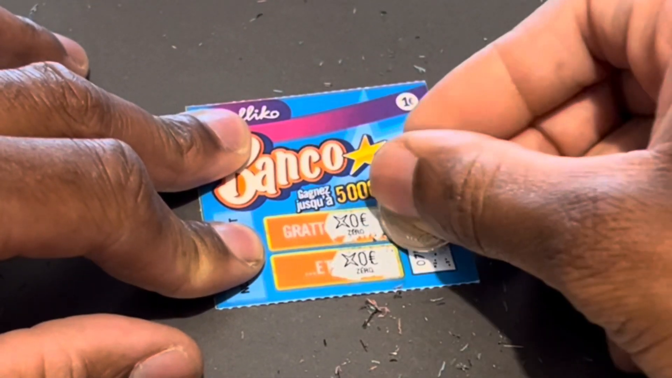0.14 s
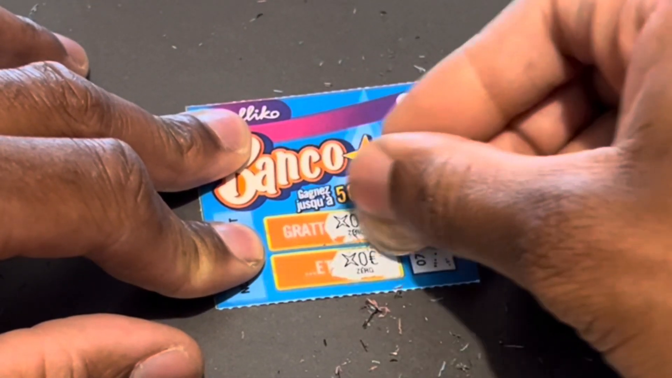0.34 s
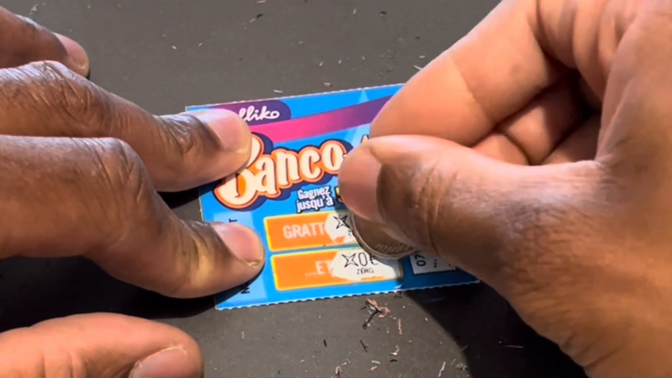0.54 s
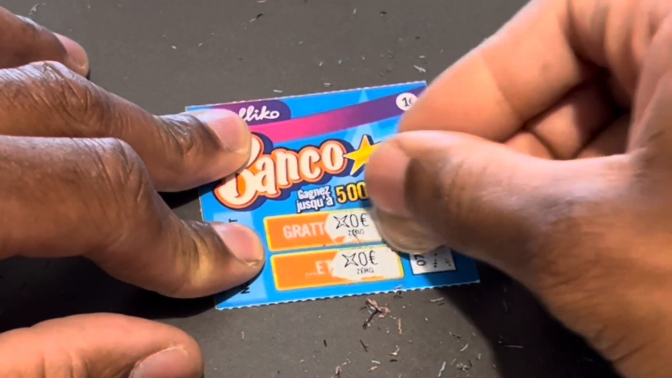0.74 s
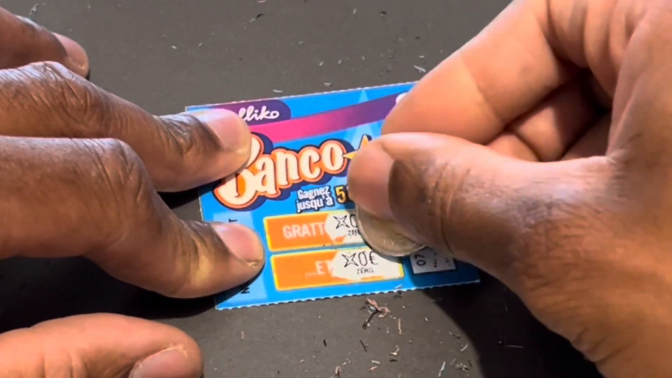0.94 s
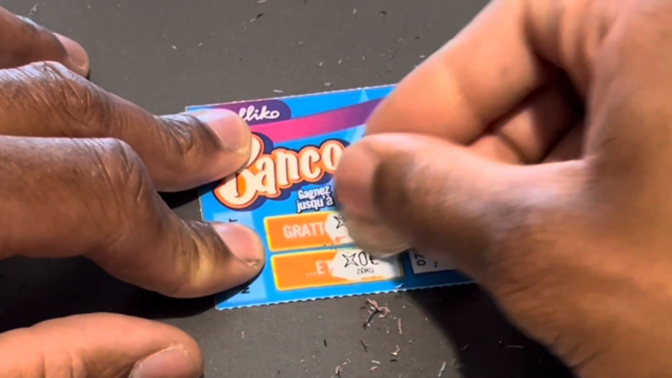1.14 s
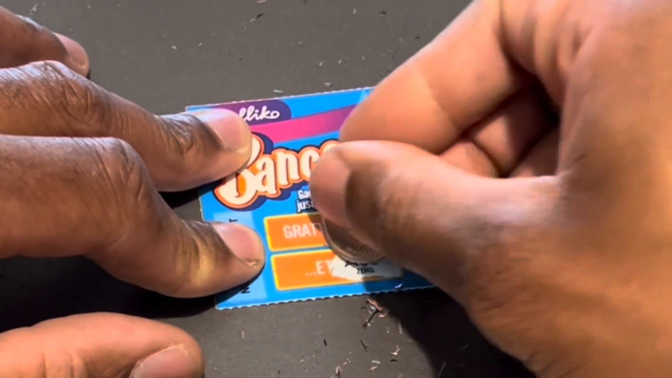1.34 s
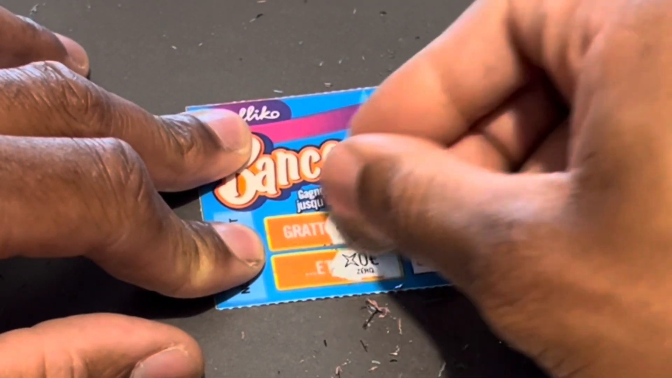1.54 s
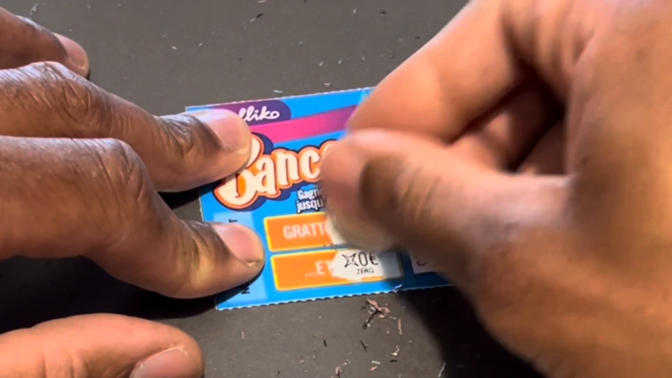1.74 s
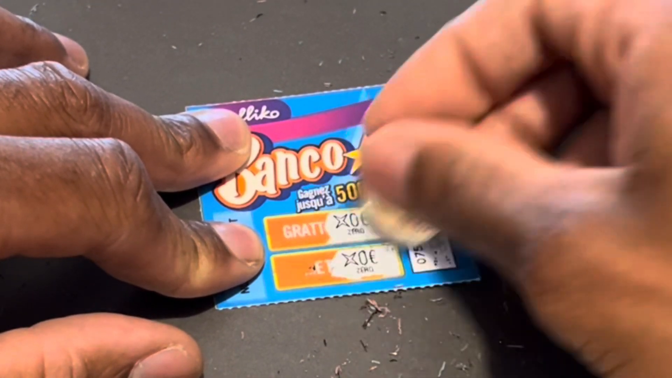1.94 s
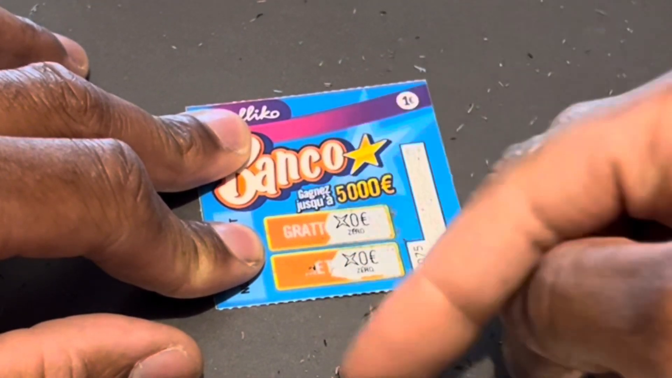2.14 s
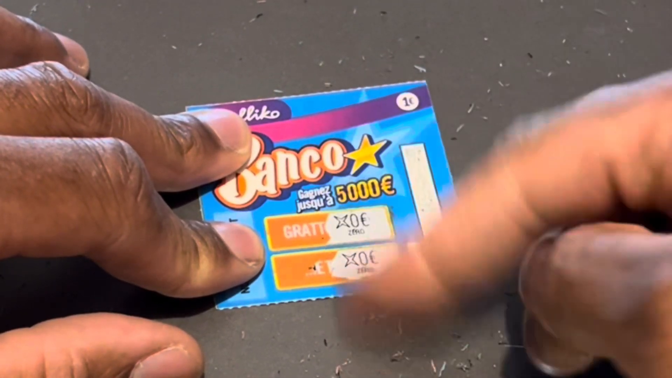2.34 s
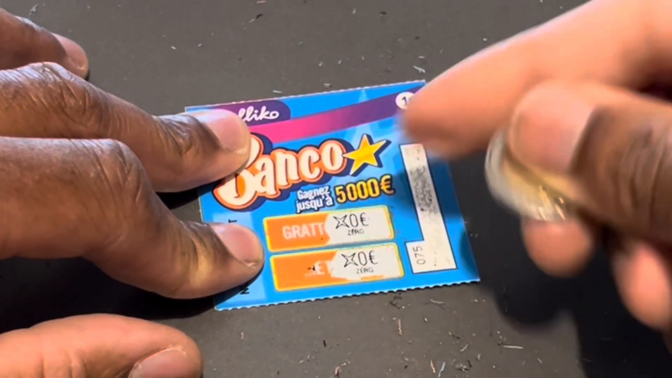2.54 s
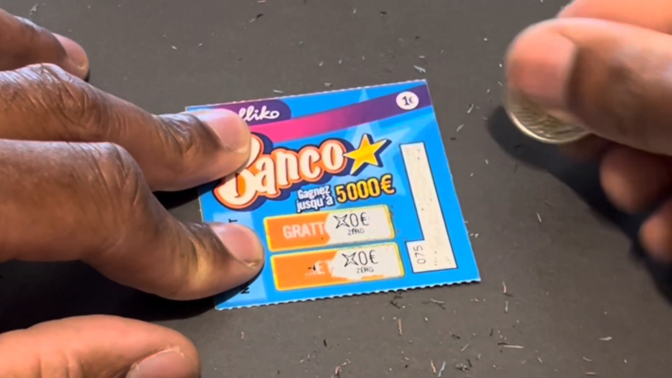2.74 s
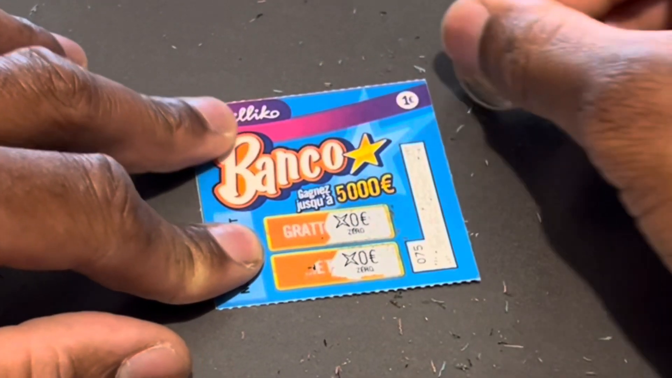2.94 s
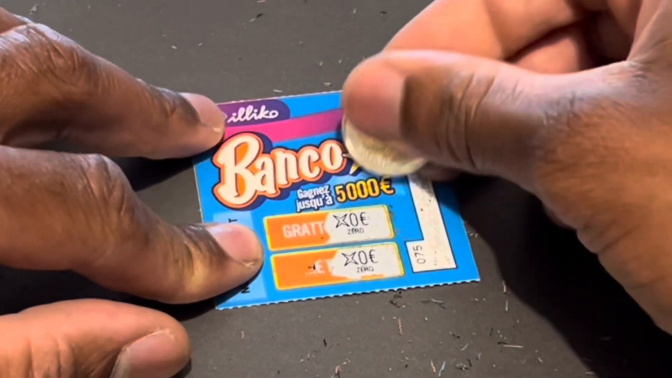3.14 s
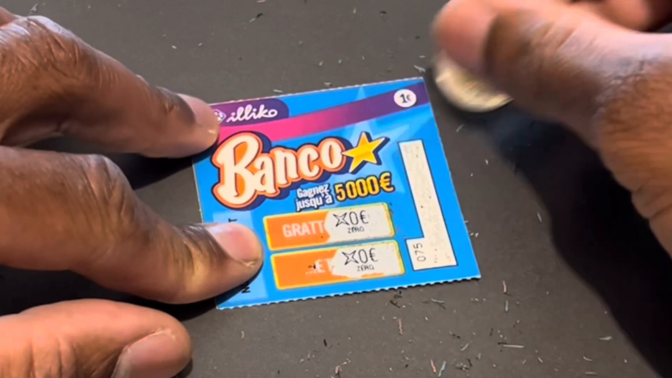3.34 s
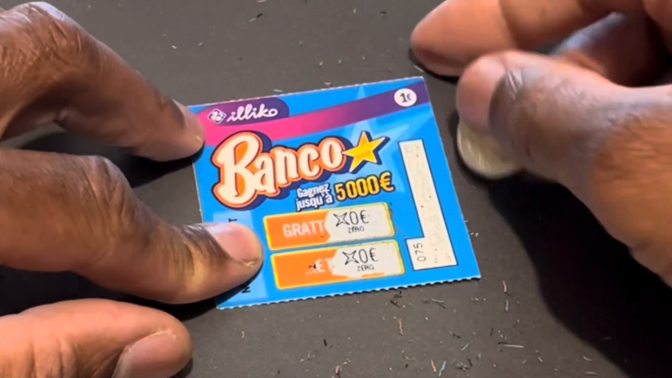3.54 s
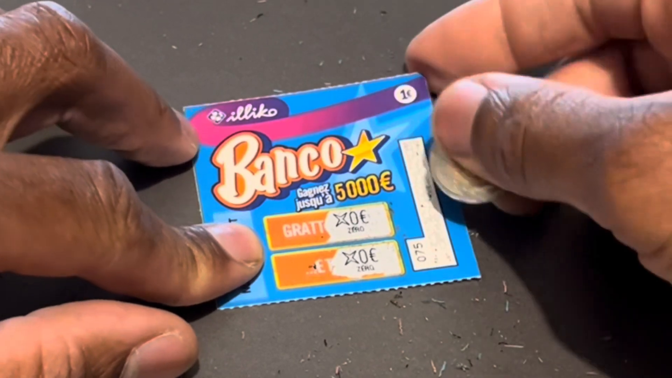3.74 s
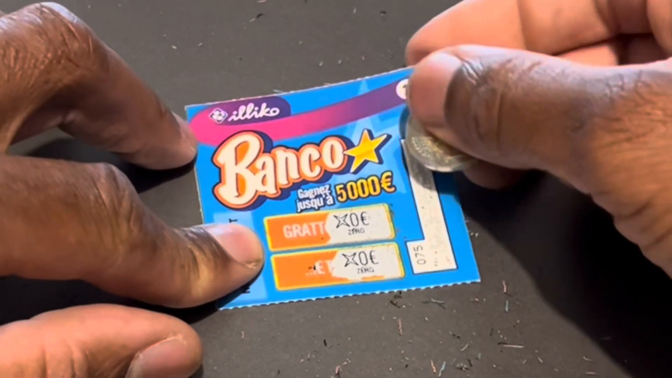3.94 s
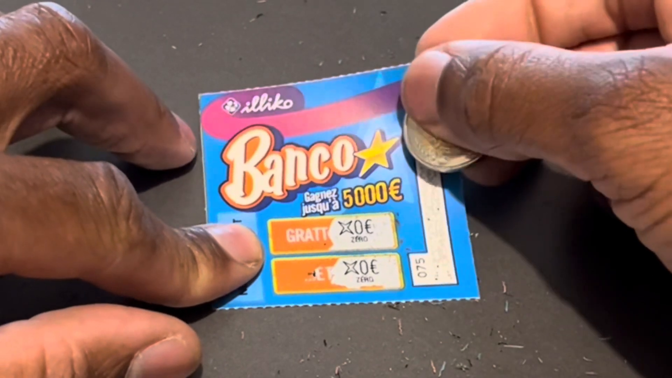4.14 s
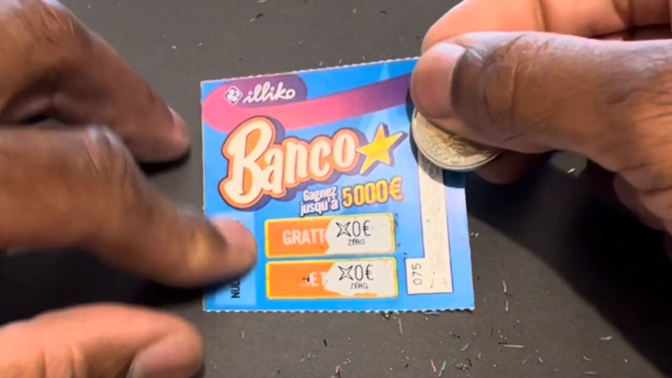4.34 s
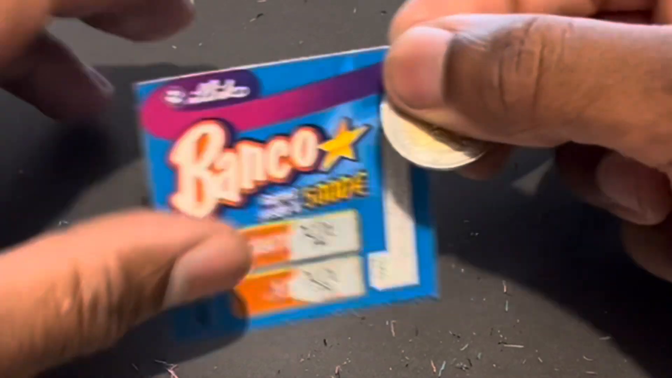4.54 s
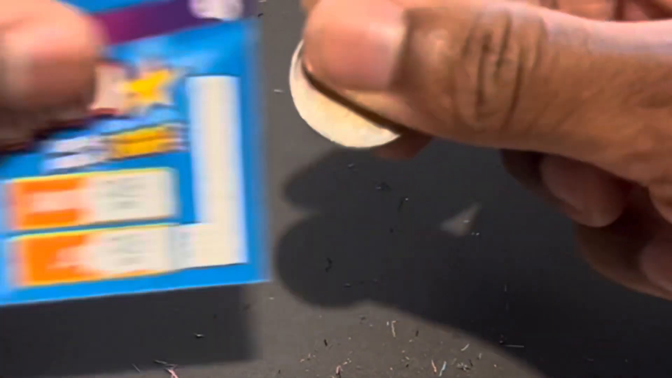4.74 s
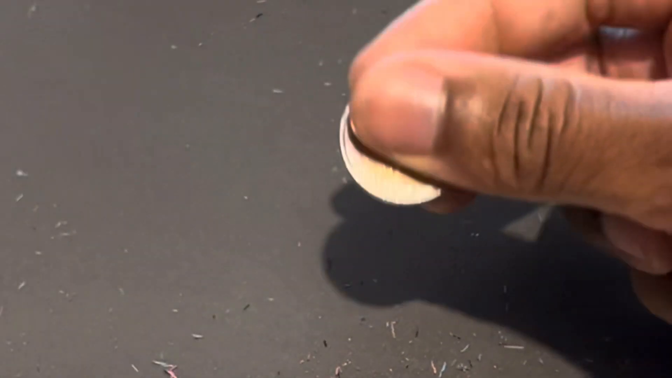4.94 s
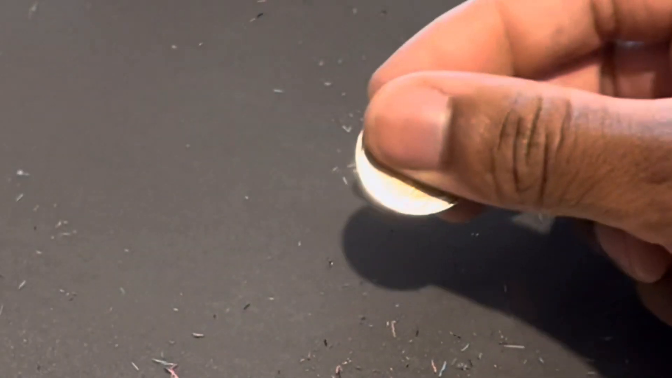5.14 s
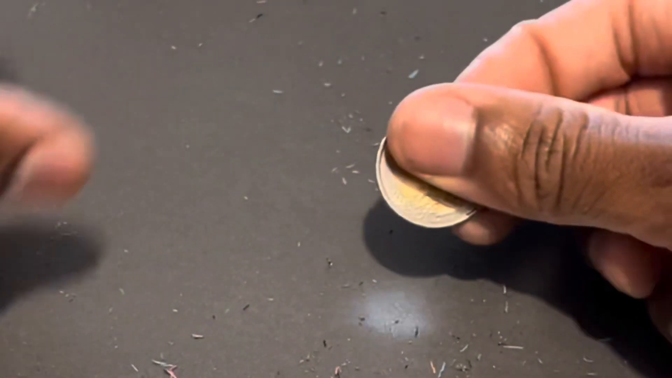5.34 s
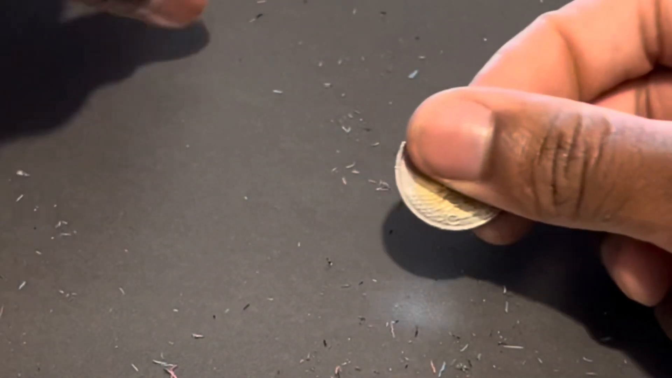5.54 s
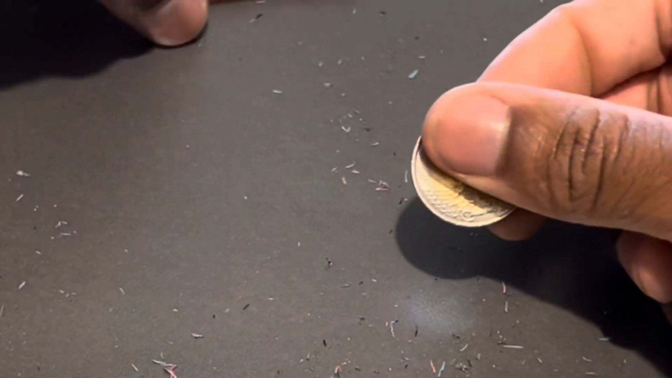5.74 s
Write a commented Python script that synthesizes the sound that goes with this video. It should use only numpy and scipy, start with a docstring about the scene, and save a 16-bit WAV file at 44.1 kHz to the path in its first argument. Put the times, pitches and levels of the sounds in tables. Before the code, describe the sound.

Quick alternating scratching strokes on a small card, a pause with soft thuds and rustles, then snappy card ticks and a papery slide.

```python
"""A quiet room, close to a two-port microphone. First a coin scrapes a paper card to and fro on a hollow
table: many small slips shake the table's modes, and filtered slips make a faint hiss. A first tick, a crack
of noise ringing the card, falls among the strokes; then hands shift on the table with a low rumble. Fingers
sweep and tap: dense slips hiss through the paper and single pushes thud in the table. After a scuff of a
hand sweeping crumbs in two pulls, the card slides away with more hiss, ticks and soft thuds."""
import sys
import numpy as np
from scipy import signal
from scipy.fft import rfft, irfft, next_fast_len
from scipy.io import wavfile
from scipy.ndimage import uniform_filter1d

SR = 44100
rng = np.random.default_rng(int(sys.argv[2]) if len(sys.argv) > 2 else 0)


def unload_audio(sound):
    """Save the sound as a 16-bit wav file, at the path given as the first command line argument."""
    columns = np.transpose(np.atleast_2d(sound))
    # keep every value between -1 and 1, then stretch to whole-number steps
    steps = np.round(np.clip(columns, -1, 1) * 32767)
    wavfile.write(sys.argv[1], SR, steps.astype(np.int16))


N = 259749  # length of the scene [samples]


def gain_of(db):
    """Turns decibels into a factor on the wave."""
    return 10 ** (np.asarray(db) / 20)


def evened(x):
    """Scales a sound to an rms level of 1."""
    return x / np.sqrt(np.mean(x ** 2) + 1e-20)


def read(points, hz):
    """Reads a curve between its points, with straight lines over log frequency."""
    point_hz, value = np.transpose(points)
    return np.interp(np.log(hz + 1), np.log(point_hz + 1), value)


def coloured(x, points):
    """Filters a sound by a curve of level over frequency, then sets its rms to 1."""
    size = next_fast_len(N)
    hz = np.fft.rfftfreq(size, 1 / SR)
    spectrum = rfft(x, size) * gain_of(read(points, hz))
    return evened(irfft(spectrum, size)[:N])


def swells(rows, lag=0., rise_share=1., fall_share=1., roundness=1., held=False):
    """Sums the swells of all rows; each further column follows whichever swell is loudest."""
    step = 44  # the curves are worked out about once a millisecond
    t = np.arange(0, N + step, step) / SR
    peak, db, rise, fall, *rest = np.transpose(rows)[:, :, None]
    hold = abs(rest.pop()) if held else 0
    late = t - peak - lag
    # rise and fall are the times between the peak and 20 dB below it
    before = -late / (abs(rise * rise_share) + 1e-4)
    after = np.maximum(late - hold, 0) / (abs(fall * fall_share) + 1e-4)
    away = np.where(late < 0, before, after)
    gain = gain_of(db - 20 * away ** roundness)
    loudest = gain.argmax(axis=0)
    curves = [np.linalg.norm(gain, axis=0)]
    curves += [uniform_filter1d(column[loudest, 0], size=8) for column in rest]
    return [np.interp(np.arange(N) / SR, t, curve) for curve in curves]


def slips(per_s, spread_db, clump_db):
    """Rubbing as random slips of either sign, a few of them large, in clumps some milliseconds long."""
    when, size, sign, chance = rng.random((4, N))
    wander = uniform_filter1d(uniform_filter1d(chance - .5, size=150), size=150)
    size_db = clump_db * evened(wander) - spread_db * np.log(size + 0.04)
    return evened((when < per_s / SR) * gain_of(size_db) * np.sign(sign - .5))


# colour of the quiet room: (frequency [Hz], relative level [dB])
ROOM_COLOUR = [(25, -11.5), (50, 9.5), (110, 5.5), (250, -3.5), (500, -18), (1000, -20.5), (2000, -32),
               (7000, -42), (10000, -41.5), (13000, -39.5), (16000, -43)]
ROOM_DB = -65  # rms before the microphone ports


def hush():
    """The quiet room: steady noise with its own colour."""
    return gain_of(ROOM_DB) * coloured(rng.standard_normal(N), ROOM_COLOUR)


# table top, four groups of modes from low to high:
# (frequency [Hz], relative level [dB], time to die by 60 dB [s])
TABLE_MODES = [
    [(37.2, -9, 0.14), (59.3, -7, 0.094), (72.9, 2.5, 0.04)],
    [(100.1, -3.5, 0.11), (131.3, 8, 0.097), (169, -5, 0.057)],
    [(188.2, 1, 0.088), (241.8, 6, 0.07), (298.2, -4.5, 0.11), (373, -1, 0.033), (389, -11, 0.12)],
    [(441, 11.5, 0.039), (517, 9.5, 0.032), (619, 5.5, 0.057), (757, -6, 0.13), (830, -4.5, 0.079),
     (1041, -2.5, 0.018)],
]
TRAVEL = 0.1037  # delay [s] at 1 Hz; low bending waves are slower: it falls with the root of frequency


def ringing(modes):
    """Answer of one group of table modes to a push: each comes late, swells for a cycle and dies."""
    ring = 0
    for k, (hz, db, t60) in enumerate(modes):
        t = np.maximum(np.arange(SR // 4) / SR - TRAVEL / np.sqrt(hz), 0)
        onset = 1 - np.exp(-(t * hz / 0.53) ** 2)
        ring = ring + (-1) ** k * gain_of(db - 60 * t / t60) * onset * np.sin(2 * np.pi * hz * t)
    return ring / np.linalg.norm(ring)  # energy 1


def table(forces):
    """Each group of table modes rings under its own share of the force."""
    return sum(signal.oaconvolve(force, ringing(modes))[:N] for force, modes in zip(forces, TABLE_MODES))


# coin strokes, strong forth and light back; the last two rows are a hand sweeping crumbs:
# (peak time [s], relative table shaking [dB], rise [s], fall [s], and on top of the shaking:
# grit [dB], slow shove [dB], rasp in the top table modes [dB])
SCRAPES = [(.224, -42.5, 0.097, 0.068, -20.5, -6, -3), (.36, -50.5, 0.071, 0.098, -10.5, -9, 2),
           (.504, -40.5, 0.067, 0.07, -24, -6.5, -3), (.645, -54, 0.1, 0.039, -21.5, -8, 4.5),
           (.762, -41, 0.078, 0.082, -16, -6, -1.5), (.902, -53, 0.11, .07, -21.5, -10, 1),
           (1.032, -42, 0.062, 0.05, -20.5, -6.5, -1), (1.155, -52.5, 0.11, 0.11, -19.5, -7, -2.5),
           (1.29, -37.5, 0.075, 0.062, -18, -10.5, -1.5), (1.38, -51.5, 0.052, 0.1, -9.5, -25, 0.5),
           (1.54, -38.5, 0.075, 0.058, -23.5, -15, -2.5), (1.625, -55.5, 0.07, .09, -19, -7, 0),
           (1.756, -41, 0.058, 0.11, -10.5, -12, 1.5), (2.985, -41, 0.052, 0.071, -13, -17, 4.5),
           (3.03, -45.5, 0.085, 0.086, -11.5, -3, -9.5)]
# how a stroke shares itself among the two middle groups of table modes: (level [dB], level [dB])
STROKE_SHARES = [-0.11, 0.079]
# colour of the grit: (frequency [Hz], relative level [dB])
GRIT_COLOUR = [(700, 9.5), (1100, 10.5), (1500, 1), (2300, -2.5), (3000, -10), (3600, -14.5), (5000, -9.5),
               (6200, -21), (7500, -16.5), (9500, -24), (12500, -19), (16000, -40)]
# lags and leads in seconds; rises and falls are multiples of the stroke's own; round: 1 pointed, 2 round
PRESS_LEAD_S, STROKE_ROUND = .006, 1.25  # the pressure on the middle modes peaks a little early
GRIT_LAG_S, GRIT_RISE, GRIT_FALL = 0.0057, 0.46, 0.82  # grit comes late and suddenly
SHOVE_LEAD_S, SHOVE_RISE, SHOVE_FALL = .005, 2, 0.84  # the hand leans in before the stroke
# the rasp holds during the stroke and stops with it
RASP_LAG_S, RASP_RISE, RASP_FALL, RASP_ROUND = 0.0018, 0.81, 0.79, 2.47


def scrapes():
    """The coin, later a hand on crumbs, judders along: slips shake the table and fine grit hisses."""
    press = swells(SCRAPES, -PRESS_LEAD_S, roundness=STROKE_ROUND)[0]
    edge, grit_db, *_ = swells(SCRAPES, GRIT_LAG_S, GRIT_RISE, GRIT_FALL)
    lean, _, shove_db, _ = swells(SCRAPES, -SHOVE_LEAD_S, SHOVE_RISE, SHOVE_FALL)
    rasp, *_, rasp_db = swells(SCRAPES, RASP_LAG_S, RASP_RISE, RASP_FALL, RASP_ROUND)
    judder = slips(per_s=900, spread_db=2.0, clump_db=1.5)
    forces = [lean * gain_of(shove_db)]
    forces += [press * gain_of(db - 3.0) for db in STROKE_SHARES]
    forces += [rasp * gain_of(rasp_db - 5.0)]
    fine_slips = slips(per_s=9900, spread_db=3.0, clump_db=3.5)
    grit = edge * gain_of(grit_db + 4.0) * coloured(fine_slips, GRIT_COLOUR)
    return table([judder * force for force in forces]) + grit


# sharp ticks of card edge and coin: (peak time of the crack [s], relative level [dB],
# part of the card that rings [octaves above 1 kHz], bare crack on top of the ringing [dB],
# time for the crack to die by 60 dB [s])
CARD_TICKS = [(1.388, -62, 0.95, -2, 0.0063), (2.0263, -53.5, 3.3, 12.5, .011),
              (2.111, -58, 0.88, 17.5, 0.035), (2.2892, -53, 0.52, 20.5, 0.0049),
              (2.329, -64, 0.66, 19, 0.022), (2.352, -59.5, 4.7, 20, .043), (2.999, -57, 4, 13.5, 0.0097),
              (3.222, -84, 2.1, 16, 0.0051), (3.351, -62.5, 0.33, 1.5, 0.0068),
              (3.518, -64.5, 2.0, 12, 0.01), (4.011, -59, 2.4, 13.5, 0.01), (4.14, -71, 2.1, -7, .014),
              (4.325, -62, 1.5, -14, 0.02), (4.457, -46.5, 1.3, 13.5, 0.038), (4.465, -27, 1.2, -4, 0.029),
              (4.597, -45.5, 0.52, -3, 0.0074), (4.607, -63, 0.7, 6, 0.014), (4.6363, -29.5, 1.3, 8, 0.013),
              (4.7005, -45.5, 0.82, -6, 0.036), (4.709, -42.5, 1.15, -5, 0.013),
              (4.959, -41.5, 0.82, -10, 0.012), (5.0515, -36.5, 3.5, -19, 0.0083),
              (5.062, -36, 3.7, -7, 0.0081), (5.103, -31.5, 2.06, -4.5, 0.017),
              (5.61, -54, 0.39, -1.5, 0.018), (5.628, -63, 0.96, 7, 0.015), (5.644, -72.5, 3.2, 18.5, 0.02),
              (5.741, -69.5, 1.1, 12, 0.021)]
# modes of the card, also used by the slides: (frequency [Hz], relative level [dB], time to die by 60 dB [s])
CARD_MODES = [(1425, -0.5, 0.084), (2100, -6, 0.033), (3005, 0.5, 0.033), (3430, 0.5, 0.047),
              (4480, 2.5, 0.017), (5000, -30, 0.0093), (7600, 2.5, 0.022)]
NEAR_DB = 11  # a card mode is woken this much less for each octave away from the part touched
TICK_RISE = 0.041  # rise time as a share of the crack's dying time
HELD = 1.2  # fingers cut the card's ringing: dying time of that damping as a multiple of the crack's
BARE = signal.butter(2, [1000, 13500], "bandpass", fs=SR)  # colour of the crack itself
THIN = signal.butter(3, 800, "highpass", fs=SR)  # a small card radiates no bass


def add(mix, s, sound):
    """Mixes a sound in at a time in seconds."""
    part = mix[round(s * SR):][:len(sound)]
    part += sound[:len(part)]


def ticks():
    """A crack of noise swells and dies quickly and rings the nearest modes of the card."""
    out = np.zeros(N)
    t = np.arange(4000) / SR
    for s, db, octave, bare_db, t60 in CARD_TICKS:
        rise = TICK_RISE * t60
        dying = gain_of(-60 * np.maximum(t - rise, 0) / t60)
        crack = rng.standard_normal(len(t)) * np.minimum(t / rise, 1) ** 2 * dying
        ring = 0
        for hz, mode_db, life in CARD_MODES:
            woken_db = mode_db - NEAR_DB * abs(np.log2(hz / 1000) - octave)
            damping_db = 60 * t / life + 60 * t / (HELD * t60)
            ring = ring + gain_of(woken_db - damping_db) * np.sin(2 * np.pi * hz * t)
        card = signal.fftconvolve(crack, ring / np.linalg.norm(ring))[:len(t)]
        sound = card + gain_of(bare_db) * signal.lfilter(*BARE, crack)
        add(out, s - rise, gain_of(db - 4.5) * signal.lfilter(*THIN, sound))
    return out


# hands shifting on the table: (peak time [s], relative rumble [dB], rise [s], fall [s],
# harder rubbing on top of the rumble [dB])
HAND_SHIFTS = [(1.9, -55, 0.095, 0.074, -28), (2.122, -45.5, 0.091, 0.062, -3), (2.36, -49, 0.22, 0.3, -4),
               (2.818, -43.5, .018, 0.1, -1), (3.1, -55.5, .05, .12, -6), (3.36, -73, 0.18, 0.15, -12),
               (3.516, -59.5, 0.074, 0.067, 2.5), (3.624, -51.5, 0.046, 0.13, -3.5),
               (3.72, -55.5, 0.15, 0.12, -13), (3.816, -55, 0.018, 0.071, -25), (3.95, -62.5, .06, 0.16, 4),
               (4.07, -60.5, 0.12, 0.24, -27), (4.22, -70.5, 0.12, 0.11, -31),
               (4.476, -55.5, 0.095, 0.13, -12), (4.655, -60.5, 0.028, 0.24, 3),
               (4.95, -55, .06, 0.15, -18), (5.02, -55.5, 0.42, 0.12, -6), (5.11, -60, 0.12, 0.32, 2.5),
               (5.5, -67.5, 0.44, 0.26, -28), (5.615, -49.5, 0.012, 0.32, -7),
               (5.8, -58.5, 0.19, 0.4, -14.5)]


def hands():
    """Skin creeps over the table in small slips and keeps its low modes murmuring."""
    level, rub_db = swells(HAND_SHIFTS)
    creep = level * slips(per_s=460, spread_db=3.5, clump_db=-1.5)
    return table([creep * gain_of(db) for db in (-4.5, -6.0, -8.0, rub_db - 12.5)])


# soft blows: (time [s], relative strength [dB], part of the table struck [octaves above 100 Hz],
# deep shove on top of the strength [dB])
SOFT_THUDS = [(2.028, -25.5, 1.26, 0), (2.113, -11, 1.1, -32), (2.29, -15.5, 0.31, 1),
              (2.349, -5.5, 2.03, -10.5), (2.465, -31, .4, 6), (2.496, -13, 0.08, -28),
              (2.527, -18.5, .1, -25), (2.819, -11, 1.76, -25), (3.011, -10.5, 1.96, -2),
              (3.029, -28, 1.2, 10), (3.351, -34, 0.48, -15), (3.515, -21.5, .9, -39),
              (3.612, -25.5, 1.2, -9), (3.693, -20, 0.98, -7), (3.747, -25.5, 0.63, -1),
              (3.767, -29, 0.47, -10), (3.835, -37, .3, 5), (3.962, -26.5, 0.51, -19),
              (4.029, -41.5, .3, 17.5), (4.213, -28.5, .3, -12), (4.444, -27, .4, -8.5),
              (4.478, -28.5, 0.62, 3), (4.634, -11, 2.2, 0), (4.93, -29, 0.2, -15), (5.065, -24, .5, 6),
              (5.1, -24.5, 2.6, -2), (5.223, -35.5, 0.46, 14), (5.604, -18, 1.53, -1),
              (5.622, -19, 1.55, 8), (5.634, -22, 1.7, -15)]
# how a blow shares itself among the three higher groups of table modes: (level [dB], one per group)
BLOW_SHARES = [0.1, -3.5, -7.5]
SPOT_DB = 8.5  # a group is woken less by this times the square of its octaves from the part struck


def thuds():
    """Each blow is one push into the table, shared among its groups of modes."""
    forces = np.zeros((len(TABLE_MODES), N))
    group_hz = np.array([np.mean(modes, axis=0)[0] for modes in TABLE_MODES[1:]])
    octaves = np.log2(group_hz / 100)
    for s, db, octave, shove_db in SOFT_THUDS:
        higher_db = BLOW_SHARES - SPOT_DB * (octaves - octave) ** 2
        push = round((s - .003) * SR)  # a little early, as the table answers late
        forces[:, push] += gain_of(db + np.r_[shove_db, higher_db])
    return table(forces)


# skin and card sliding: (peak time [s], relative hiss [dB], rise [s], fall [s],
# where the hiss is strongest [Hz], airy top on top of the hiss [dB], hold at the peak [s])
CARD_SLIDES = [(2.03, -66.5, 0.0063, 0.083, 4370, 4, 0.035),
               (2.109, -52.5, 0.053, 0.053, 2200, -6.5, 0.0028), (2.291, -55, 0.0034, 0.023, 2600, 1, .002),
               (2.335, -52, 0.023, 0.062, 2440, -2.5, 0.016), (2.43, -87.5, .08, 0.22, 3940, 6.5, 0.025),
               (2.62, -97, .1, 0.09, 3000, 9.5, 0.029), (2.755, -80.5, 0.052, 0.15, 7300, 6.5, 0.028),
               (2.83, -75, 0.074, 0.13, 2620, -2.5, .05), (3.0, -55, 0.037, 0.034, 1760, -7, 0.01),
               (3.05, -64, 0.039, 0.049, 3860, 4, 0.0095), (3.15, -91, .1, .1, 2540, 5.5, .03),
               (3.478, -78.5, 0.036, 0.045, 2900, 0.5, 0.14),
               (4.012, -69.5, 0.0093, 0.049, 3300, -14, 0.057),
               (4.215, -70, 0.026, 0.081, 3140, -21, 0.019), (4.3, -77.5, .1, .1, 2800, -8, .02),
               (4.36, -61, 0.044, .05, 3460, -12, 0.05), (4.45, -57, 0.12, 0.025, 3700, -10, .01),
               (4.478, -56.5, 0.011, 0.064, 1537, -13, 0.0028),
               (4.647, -52, 0.012, 0.091, 3300, -14, 0.0041), (4.7, -58.5, 0.097, 0.036, 2450, -11, 0.01),
               (4.76, -72, .1, .1, 2660, -4, 0.028), (4.87, -64.5, 0.16, .15, 3590, -10, 0.036),
               (4.963, -57.5, 0.0028, 0.041, 3060, -10, 0.045),
               (5.0, -49.5, 0.051, 0.027, 3570, -12, 0.057), (5.055, -45, 0.0071, 0.0072, 5070, -13, 0.048),
               (5.115, -61, .01, 0.067, 3700, -9, 0.0085), (5.16, -70, .05, 0.061, 3570, -6, 0.016),
               (5.24, -77, 0.047, 0.073, 3500, -7, 0.021), (5.635, -75.5, 0.07, 0.18, 4140, 4.5, 0.027),
               (5.74, -76, 0.11, 0.1, 2260, 0.5, .1)]
# colour of the paper hiss: (frequency [Hz], relative level [dB])
PAPER_COLOUR = [(500, 22), (1200, 2), (3000, -3.5), (5000, -1), (8000, -3), (9500, 5), (11000, 19.5),
                (13000, -19)]
# colour of the airy top: (frequency [Hz], relative level [dB])
AIR_COLOUR = [(8500, 5), (10000, 12), (12000, 13.5), (15000, 8.5), (16500, -9)]
HUMP_WIDTH_HZ = 900  # width of the card modes under a sliding finger


def resonate(x, hz, width):
    """A damped mode: shifts hz down to zero, smooths, and shifts back."""
    turn = np.exp(2j * np.pi * hz * np.arange(len(x)) / SR)
    r = np.exp(-np.pi * width / SR)
    return 2 * (turn * signal.lfilter([1 - r], [1, -r], x / turn)).real


def slides():
    """Dense tiny slips through the stiff paper; its damped modes hiss most near the part touched."""
    level, near_hz, air_db = swells(CARD_SLIDES, held=True)
    paper, air = (coloured(slips(per_s=23000, spread_db=5.0, clump_db=2.5), colour)
                  for colour in (PAPER_COLOUR, AIR_COLOUR))
    modes = 0
    for k, (hz, *_) in enumerate(CARD_MODES):
        nearness = gain_of(-NEAR_DB * abs(np.log2(hz / near_hz)))
        modes = modes + (-1) ** k * nearness * resonate(paper, hz, HUMP_WIDTH_HZ)
    return level * (0.082 * paper + 0.77 * evened(modes) + gain_of(air_db) * air)


# how far the left port is ahead of the right: (frequency [Hz], phase [rad])
LEFT_LEAD = [(60, 0), (2400, .1), (3200, .8), (5500, 0), (7600, -.1), (8700, -1.1), (9200, -np.pi),
             (10800, -np.pi), (11400, -4.4), (12700, -6.1), (14200, -6.4), (15600, -9.2)]
# how much louder the left port is than the right: (frequency [Hz], level [dB])
LEFT_BALANCE = [(60, 1.1), (300, 1.5), (600, -1.5), (1200, 2), (3000, 1.5), (8000, .3), (9000, 0),
                (15000, 0)]
# gain of the part that the two ports hear with opposite sign: (frequency [Hz], level [dB])
UNLIKE_PART = [(25, -24), (150, -21), (300, -14), (600, -7), (1200, -8), (2500, -10), (6000, -13),
               (8500, -12), (9300, -32), (10600, -32), (11500, -12), (15000, -12)]


def ports(common, unlike):
    """Two ports in one case: a phase lead, a balance, a part of opposite sign, little deep bass."""
    size = next_fast_len(N + 2000)
    hz = np.fft.rfftfreq(size, 1 / SR)
    mid = rfft(common, size)
    side = gain_of(read(UNLIKE_PART, hz)) * rfft(unlike, size)
    # each port takes half of the balance and the lead
    half = gain_of(read(LEFT_BALANCE, hz) / 2) * np.exp(.5j * read(LEFT_LEAD, hz))
    both = np.array([half * (mid + side), (mid - side) / half])
    bass_cut = 1 + (28 / (hz + 1)) ** 2
    return irfft(both / bass_cut, size)[:, :N]


def scene():
    """Rubbing reaches the ports from many patches of table and card, so part of it differs between them."""
    common, unlike = (hush() + scrapes() + hands() + slides() for _ in range(2))
    hiss = gain_of(-90.5) * rng.standard_normal((2, N))  # separate faint noise in each channel
    return ports(common + ticks() + thuds(), unlike) + hiss


EDGE_HZ = 15650  # top of the band


def record(dry):
    """Limits the band with a steep low-pass filter."""
    low_pass = signal.firwin(511, EDGE_HZ, window=("kaiser", 9), fs=SR)
    return signal.oaconvolve(dry, low_pass[None], "same")


dry = scene()
out = record(dry)
unload_audio(out)
```